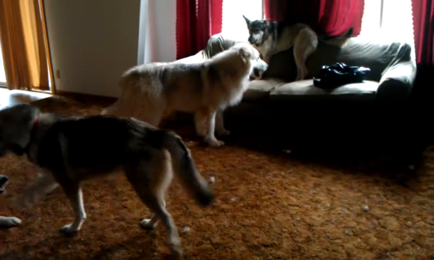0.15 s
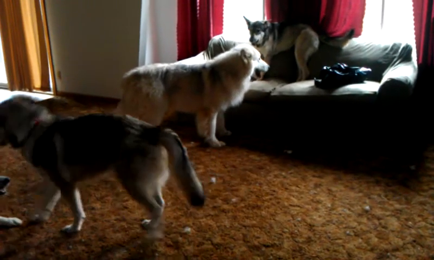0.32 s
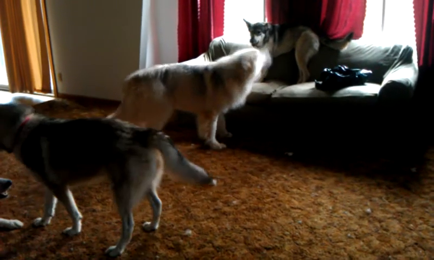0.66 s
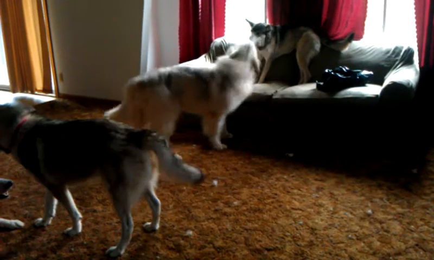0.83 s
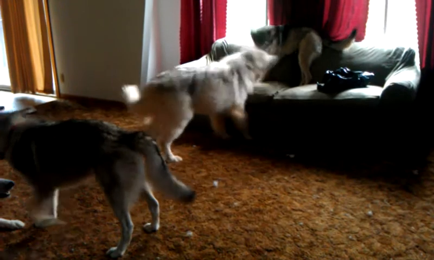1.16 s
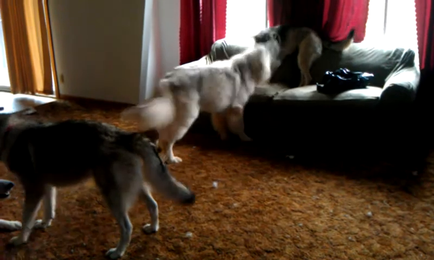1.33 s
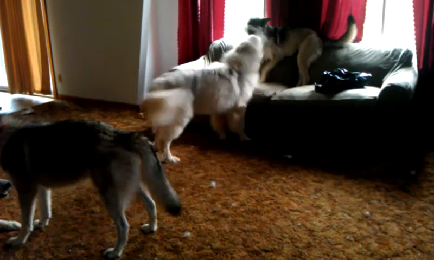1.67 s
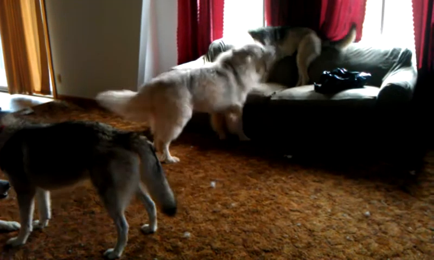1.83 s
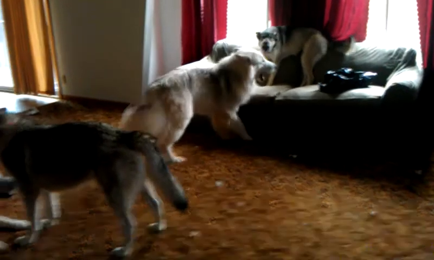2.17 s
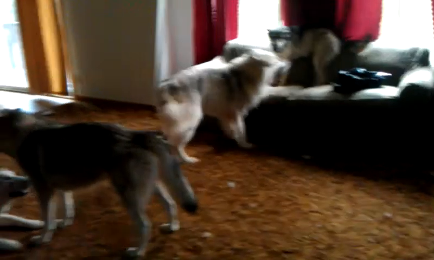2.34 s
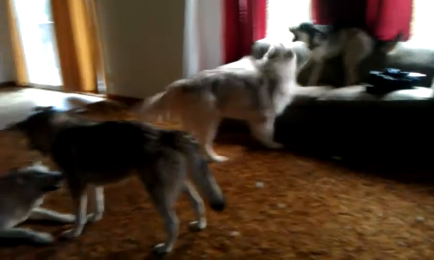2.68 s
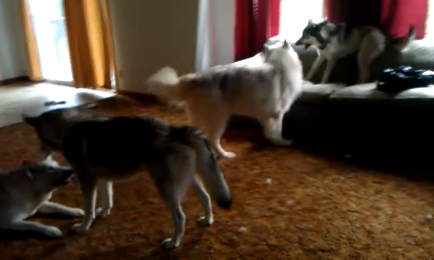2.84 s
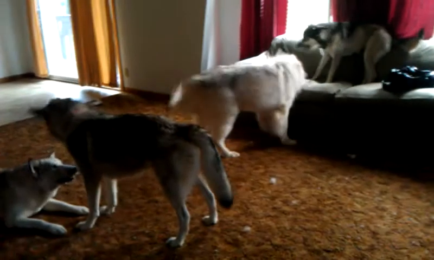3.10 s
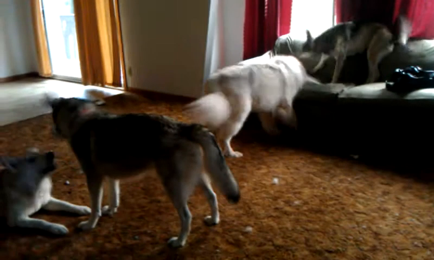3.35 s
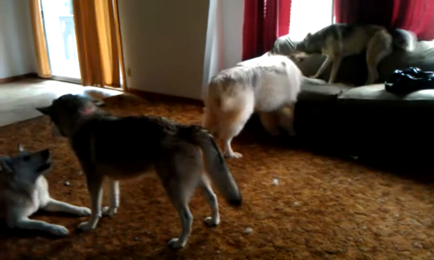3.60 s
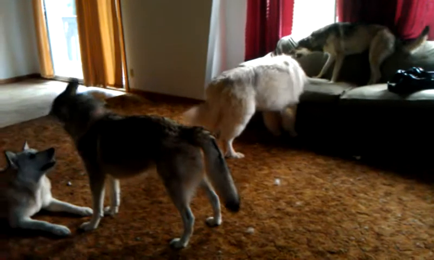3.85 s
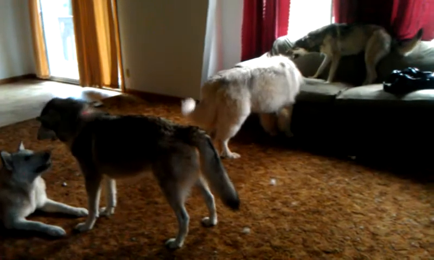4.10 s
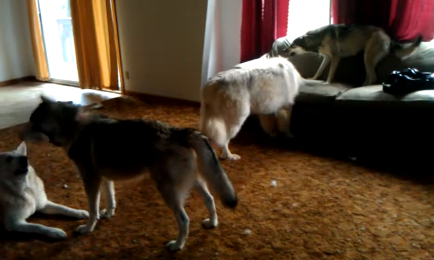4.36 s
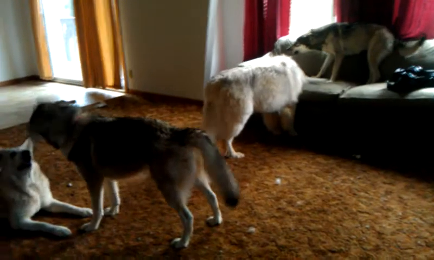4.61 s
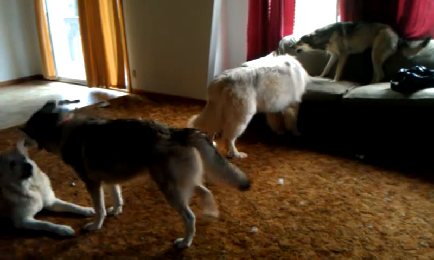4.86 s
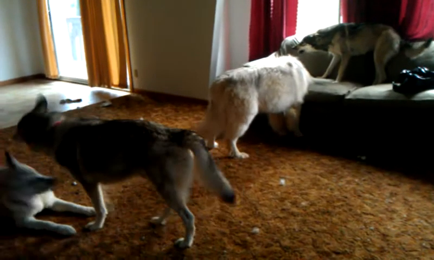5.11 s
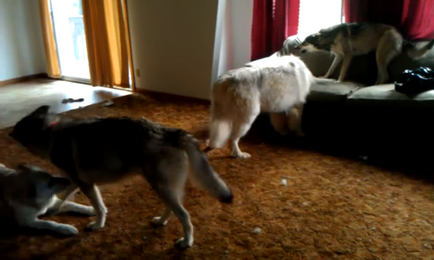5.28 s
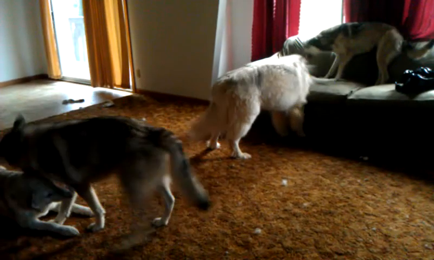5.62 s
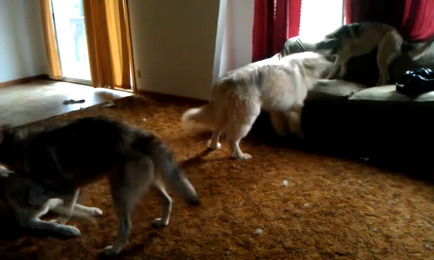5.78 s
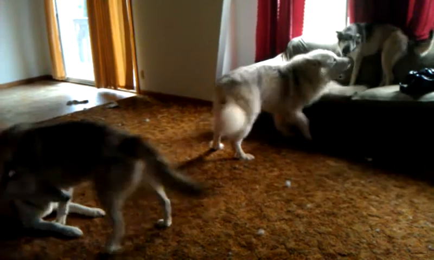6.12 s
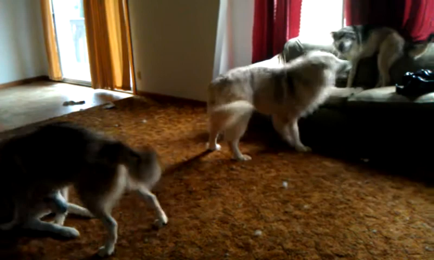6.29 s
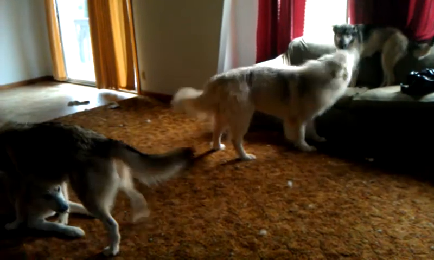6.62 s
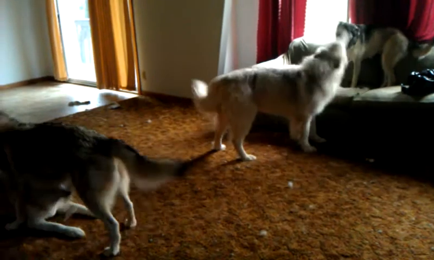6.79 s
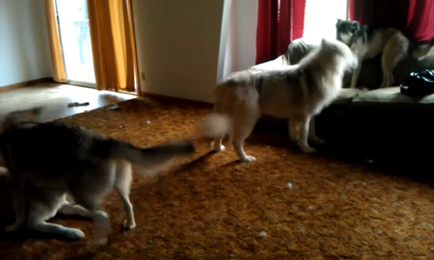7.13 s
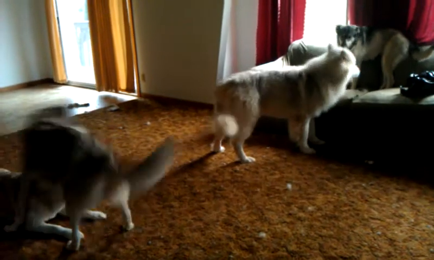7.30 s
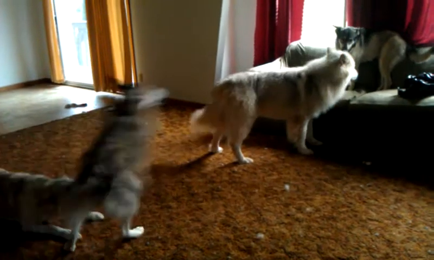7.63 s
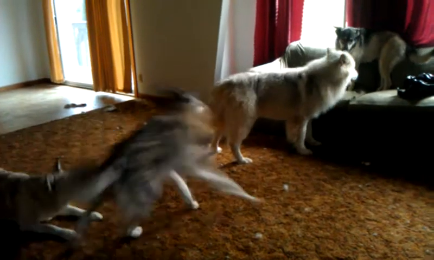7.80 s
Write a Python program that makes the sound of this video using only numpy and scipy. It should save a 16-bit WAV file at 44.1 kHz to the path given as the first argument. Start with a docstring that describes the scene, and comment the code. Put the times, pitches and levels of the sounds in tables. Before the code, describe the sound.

Two huskies vocalize at play in a living room. From about 0.2 to 1.1 seconds, one gives a quick run of short, whiny yowls, each scooping up and sinking, sometimes cracking. The other answers with short, higher, hoarse barks at about 1.2, 2.0 and 2.5 seconds, alternating with more yowls around 1.7, 2.3 and 3.0. The barks then continue alone at 3.3, 3.6, 4.1 and 4.7 seconds. From 5.4 to 7.3 the yowls return in a steady string, mostly lower and sinking into groans, with two rougher barks at 5.6 and 6.2. Faint, thin nasal whistles top the calls near the start, at 3 seconds and around 7. Paws thud softly on carpet at 7.1 and, more faintly, 7.9 seconds. The room echoes briefly over very faint room noise and electrical hum, and the loudest calls slightly overload the small microphone.

```python
"""Two huskies play-wrestle: one yowls and whines in short arched calls, the other answers in hoarse barks.
Their vocal folds buzz, throat and mouth shape the buzz, and uneven vibration and rushing air roughen it.
A tight throat adds thin whistles. Paws thud softly on the carpet, the living room rings briefly
and the mains hum faintly. The loudest calls overload the camera's small microphone."""
import sys
import numpy as np
from scipy import signal
from scipy.fft import rfft, irfft, next_fast_len
from scipy.io import wavfile
from scipy.ndimage import map_coordinates

SR = 44100
rng = np.random.default_rng(int(sys.argv[2]) if len(sys.argv) > 2 else 0)


def master_out(mix):
    """Clip the mix to full scale and print it as 16-bit PCM to the path in sys.argv[1]."""
    frames = np.transpose(np.atleast_2d(mix))
    ceiling = np.clip(frames, -1, 1)
    pcm = np.round(ceiling * 32767).astype(np.int16)
    wavfile.write(sys.argv[1], SR, pcm)


N = 350771

# the thin treble from the muzzle: f/Hz, relative level/dB
MUZZLE_TREBLE = [(1500, -48.5), (3100, -12.5), (4500, -6), (5800, -6), (8000, -12.5), (11000, -25.5),
                 (15500, -33)]


def yowls():
    """The first dog: clear arched calls that crack now and then and sink into a groan."""
    # each row is a yowl, or a brief tone swelling just after one:
    # start/s, rise/s, hold/s, fall/s, top pitch/Hz, climb/s, final sink/octaves,
    # relative level/dB of the low, middle and high resonance, factor on the resonance frequencies
    sounds = [ (0.189, 0.049, 0.024, .05, 795, 0.0068, .45, -29, -43.5, -19, 0.98),
              (.258, .026, 0.021, .07, 669.6, .008, .45, -24.5, -36, -41.5, .93),
              (.485, 0.06, 0.041, 0.067, 605.6, .065, 0.21, -10.5, -19.5, -11.5, 0.96),
              (.605, 0.017, 0.031, 0.046, 583.2, 0.01, 0.52, -18, -19, -37, 0.89),
              (0.685, 0.049, 0.091, 0.045, 521.9, 0.069, .6, -12.5, -20, -20.5, 0.92),
              (.865, 0.029, .015, .04, 510, .015, .3, -13.5, -40.5, -53.5, 1.037),
              (0.959, 0.084, .054, .04, 548.5, .085, .6, -9.5, -33, -13, 0.942),
              (1.45, 0.016, 0.14, 0.032, 500, .06, .3, -48, -52.5, -57.5, 1.05),
              (1.605, 0.043, 0.025, .115, 581.4, 0.042, 1.1, -39.5, -12, -30, 0.89),
              (1.672, 0.079, 0.041, .08, 543.3, .09, 1.1, -10, -18, -14, 0.94),
              (2.317, .038, 0.084, 0.045, 554.2, .012, 0.35, -16.5, -15, -17.5, 0.89),
              (2.838, 0.046, 0.072, 0.072, 565.4, 0.072, 0.2, -37, -32, -29.5, 0.95),
              (3.021, .052, .082, .125, 528.6, .06, 1.7, -21.5, -20.5, -18.5, 0.92),
              (5.35, 0.07, 0.075, 0.069, 567, .09, .4, -15, -33, -34.5, 0.96),
              (5.742, .09, .06, .075, 518.7, 0.066, 0.87, -16, -22.5, -17, .88),
              (6.012, 0.047, .08, 0.055, 462.3, .105, .5, -9, -22.5, -19.5, 0.88),
              (6.353, 0.048, 0.086, 0.073, 461.6, 0.14, .5, -14.5, -22.5, -26, 0.82),
              (6.595, 0.05, .085, .085, 431.4, .12, 0.66, -14, -32, -30, 0.8),
              (6.858, .072, .05, .11, 446.5, .07, 1.3, -16, -23.5, -29, .92),
              (7.153, .068, 0.024, 0.084, 599.3, .06, .65, -30, -20, -29, 1.02)]
    # level changes, one row a resonance: lead-in/dB, catch/dB, end/dB, edges of the hold/dB
    shape = [(-16.5, -13.5, -22, 1.5), (-13, -3, -23.5, -3), (-14, -11, -33.5, -6)]
    # moments when the voice cracks: t/s, length/s, roughness from 0 to 1
    cracks = [(.54, .02, .2), (.29, .05, .15), (.635, .04, .3), (1.0, .05, .45), (1.5, .08, .4),
              (1.73, .05, .5), (2.38, .11, .55), (2.96, .08, .08), (3.05, .03, .3), (6.41, .05, .6),
              (6.96, .1, .2)]
    track = np.zeros(N)
    for row in sounds:
        start, shift = row[0], row[10]
        t, hz, levels_db = arch(row, shape)
        cracking = sum(depth * np.exp(-(2 * (start + t - s) / length) ** 2) for s, length, depth in cracks)
        rough = np.clip(.01 + cracking, 0, 1)
        sound = voice(t, hz, levels_db, rough, shift,
                      jitter=.0085, rasp_db=-2.5, squeak_db=-47.5, air_db=-39)
        add(track, start, sound)
    return amp(-2) * track


def barks():
    """The second dog: each bark starts as a rising tone and is hoarsest near its middle."""
    # one bark a row: start/s, rise/s, hold/s, fall/s, top pitch/Hz, climb/s, final sink/octaves,
    # relative level/dB of the low, middle and high resonance, factor on their frequencies, hoarseness
    calls = [ (1.16, .06, .03, 0.077, 717.7, .07, .2, -26.5, -33, -39.5, 1.35, 0.4),
             (2.017, .042, 0.067, .05, 691.6, 0.1, 0.38, -19, -13.5, -14.5, 1.082, 0.5),
             (2.539, 0.03, 0.091, .045, 693, 0.084, .45, -21, -19.5, -24, 1.17, .65),
             (3.285, .053, .032, .07, 720.4, 0.056, .25, -22.5, -19, -34.5, 1.31, .35),
             (3.585, 0.048, .065, .1, 684.3, .11, .35, -19, -20.5, -24.5, 1.142, .55),
             (4.098, 0.053, 0.078, .07, 677.5, 0.11, 0.27, -23.5, -19.5, -23.5, 1.12, .6),
             (4.703, .048, .085, 0.059, 672, 0.12, 0.35, -23.5, -20, -29, 1.175, 0.5),
             (5.555, 0.045, .065, 0.068, 663, .075, .25, -19.5, -17, -24.5, 1.22, .75),
             (6.162, 0.034, .08, 0.072, 676.7, .115, .3, -21.5, -16.5, -17, 1.09, 0.9)]
    # level changes, one row a resonance: lead-in/dB, catch/dB, end/dB, edges of the hold/dB
    shape = [(-22, -9, -9, 2.5), (-24, -5, -19.5, -8), (-18, -4.5, -19, -5)]
    # hoarseness sets in and eases: share of the call, share of its hoarseness
    hoarse_curve = [(0, .2), (.28, .16), (.44, .95), (.7, 0.65), (1, .35)]
    track = np.zeros(N)
    for call in calls:
        start, shift, hoarseness = call[0], call[10], call[11]
        t, hz, levels_db = arch(call, shape)
        rough = hoarseness * np.interp(t / t[-1], *np.transpose(hoarse_curve))
        bark = voice(t, hz, levels_db, rough, shift, jitter=.016, rasp_db=-3.5, squeak_db=-39, air_db=-35)
        add(track, start, bark)
    return amp(.05) * track


def arch(call, shape):
    """One call's pitch and levels: it scoops up and sinks, with the mouth widest halfway through the hold."""
    rise, hold, fall, top_hz, climb, sink = call[1:7]
    scoop_octaves, catch_s, flutter_db = .37, .012, 3
    t = np.arange(0, rise + hold + fall, 1 / SR)
    rising = np.clip(1 - t / rise, 0, 1)
    catching = np.clip((rise - t) / catch_s, 0, 1)  # the voice catches at the end of the rise
    falling = np.clip((t - rise - hold) / fall, 0, 1)
    closing = np.clip(2 * (t - rise) / hold - 1, -1, 1) ** 2
    octaves_down = scoop_octaves * np.clip(1 - t / climb, 0, 1) ** 1.8
    octaves_down += sink * np.sin(np.pi / 2 * falling) ** 1.7
    octaves_down += .012 * wobble(len(t), 39.9)  # the pitch wanders a little
    levels_db = []
    for full_db, (lead_db, catch_db, end_db, edge_db) in zip(call[7:10], shape):
        effort_db = lead_db * rising ** 1.8 + catch_db * catching + end_db * falling ** .62
        flutter = flutter_db * wobble(len(t), 36.56)  # jaw and tongue move
        levels_db.append(full_db + effort_db + edge_db * closing + flutter)
    return t, top_hz * 2 ** -octaves_down, levels_db


def voice(t, hz, levels_db, rough, shift, jitter, rasp_db, squeak_db, air_db):
    """The vocal folds' harmonics sweep through resonances, which a shorter throat shifts upward."""
    # low, middle and high resonance (the bands that throat and mouth boost), each: f/Hz, gain/dB
    resonances = [
        [(130, -35.5), (250, -25), (335, -14.5), (392, -9.5), (700, 0.5), (850, -15), (1200, -41), (4000, -87)],
        [(200, -55.5), (620, -36), (790, -4.5), (1270, -4), (1450, -39), (1900, -47), (5000, -86.5)],
        [(400, -61.5), (1120, -41.5), (1350, -4), (1750, -3.5), (2100, -15), (2500, -29.5), (3200, -58.5),
         (12000, -65.5)],
    ]
    n = len(t)
    low, middle, high = amp(levels_db)
    treble = np.hypot(middle, high) ** .63  # grows more slowly than the body of the call
    # as the pitch sinks from its top, the folds go slack and the tone breaks up
    slack = np.clip(2.2 * (1 - hz / np.maximum.accumulate(hz)) - .2, 0, .55)
    rough = np.maximum(rough, slack)
    # rough cycles are uneven in length
    hz = hz * (1 + (jitter + .05 * slack) * wobble(n, 110) + (.004 + .045 * rough) * wobble(n, 500))
    phase = 2 * np.pi * np.cumsum(hz) / SR
    harmonics = []
    for k in range(1, 24):
        body = sum(amp(db + along(band, k * hz / shift)) for db, band in zip(levels_db, resonances))
        shimmer_db = 4 * wobble(n, 25)
        squeak = (1 - rough) ** 3 * treble * amp(squeak_db + along(MUZZLE_TREBLE, k * hz) + shimmer_db)
        harmonics.append(np.sqrt(2) * (body + squeak) * np.sin(k * phase + rng.uniform(0, 2 * np.pi)))
    # strong and weak cycles take turns, which adds tones halfway between the harmonics
    doubling = 1 + .7 * rough * np.cos(phase / 2 + wobble(n, 90))
    tone = np.sqrt(1 - rough / 2) * harmonics[0] + np.sqrt(1 - rough) * doubling * sum(harmonics[1:])
    puffs = 1 + np.cos(phase) / 2  # swirling air escapes in one puff a cycle
    swirl = sum(size * noise(n, np.multiply(band, [shift, 1]), puffs)
                for size, band in zip([.55 * low, middle, high], resonances))
    rasp = amp(rasp_db) * np.sqrt(rough) * swirl
    air = amp(air_db) * treble * np.sqrt(rough + .04) * noise(n, MUZZLE_TREBLE, puffs)
    fade = np.clip(t / .025, 0, 1) * np.clip((t[-1] - t) / .021, 0, 1)
    throb = amp(2.8 * np.sqrt(rough) * wobble(n, 100))  # a rough voice also throbs in strength
    return fade * throb * (tone + rasp + air)


def whistles():
    """A tight throat adds a wavering high tone, independent of the main pitch, and a thin hiss."""
    # thin nasal whistles on top of some calls: t/s, length/s, f/Hz, level/dB
    whines = [(.185, 0.15, 4800, -55), (0.28, 0.08, 5600, -55), (3.054, 0.18, 6250, -55),
              (6.68, 0.07, 5900, -62), (6.908, 0.15, 5090, -61), (7.203, 0.14, 5700, -57)]
    track = np.zeros(N)
    for s, length, hz, db in whines:
        n = int(length * SR)
        waver = 1 + .025 * wobble(n, 60) + .012 * wobble(n, 700)
        tone = np.sin(2 * np.pi * np.cumsum(hz * waver) / SR)
        hiss = amp(-4) * noise(n, MUZZLE_TREBLE)
        add(track, s, amp(db) * np.hanning(n) * (tone + hiss))
    return track


def paws():
    """A soft landing makes the floor boom for a moment."""
    # paws landing on the carpet: t/s, relative level/dB
    landings = [(7.138, -56.5), (7.897, -68)]
    attack_s, ring_s = .006, .18
    track, t = np.zeros(N), np.arange(SR // 3) / SR
    for s, db in landings:
        boom = noise(len(t), [(40, -42), (90, -37), (180, 24), (280, -21), (1000, -52), (5000, -59)])
        add(track, s, amp(db + 3 - 60 * t / ring_s) * (1 - np.exp(-t / attack_s)) * boom)
    return track


def room(x, early_db, late_db):
    """Near walls echo within a few hundredths of a second; a smooth, fading tail follows."""
    # how long the room takes to fade by 60 dB: f/Hz, t/s
    ring_times = [(150, 0.54), (500, 0.46), (1500, 0.41), (5000, 0.64), (12000, 0.76)]
    hz, t, spectrum = signal.stft(rng.standard_normal(SR * 3 // 4), SR, nperseg=256)
    decay = amp(-60 * t / along(ring_times, hz)[:, None])
    build_up = 1 - np.exp(-t / .0039)
    tail = signal.istft(spectrum * decay * build_up, SR, nperseg=256)[1]
    walls = np.zeros(len(tail))
    walls[(rng.uniform(.003, .04, size=12) * SR).astype(int)] = rng.standard_normal(12)
    echoes = amp(early_db) * walls / np.linalg.norm(walls) + amp(late_db) * tail / np.linalg.norm(tail)
    return x + signal.fftconvolve(x, echoes)[:N]


def background():
    """Faint room noise and mains hum."""
    # the noise of the still room: f/Hz, relative level/dB
    still_room = [(30, -26.5), (70, -20), (150, 5.5), (350, 7), (700, -8.5), (2000, -10), (6000, -20),
                  (15000, -35.5)]
    hum = np.sqrt(2) * np.sin(2 * np.pi * 119.7 * np.arange(N) / SR)
    return amp(-70) * noise(N, still_room) + amp(-75.5) * hum


def amp(db):
    """Turn decibels into a gain."""
    return 10 ** (np.asarray(db) / 20)


def along(points, hz):
    """Read between (f/Hz, value) points on a logarithmic frequency axis."""
    f, v = np.transpose(points)
    return np.interp(np.log(hz + 1), np.log(f + 1), v)


def wobble(n, rate):
    """A smooth curve through `rate` random values a second."""
    return map_coordinates(rng.standard_normal(2048), [np.arange(n) * rate / SR], mode="wrap")


def noise(n, spectrum, gate=1):
    """Noise pulsed by `gate`, coloured by (f/Hz, level/dB) points and scaled to a strength (rms) of 1."""
    x = filtered(gate * rng.standard_normal(n), lambda hz: amp(along(spectrum, hz)))
    return x / np.sqrt(np.mean(x ** 2) + 1e-20)


def filtered(x, gain):
    """Turn each frequency up or down by gain(hz)."""
    m = next_fast_len(len(x) + 2048)
    return irfft(rfft(x, m) * gain(np.fft.rfftfreq(m, 1 / SR)), m)[:len(x)]


def add(track, s, sound):
    """Mix a sound into the track at s seconds."""
    part = track[round(s * SR):][:len(sound)]
    part += sound[:len(part)]


def scene():
    """The dogs in their room, in mono."""
    dogs = yowls() + barks() + whistles() + paws()
    return (room(dogs, early_db=-5.5, late_db=-7.5) + background())[None]


def record(dry):
    """Loud peaks overload the microphone and buzz; the camera cuts deep bass and the highest treble."""
    limit, low_cut_hz, top_hz = amp(-11), 75, 15750
    # tones up to about 1.5 kHz swing the microphone alike; the high treble swings it less
    swing = filtered(dry[0], lambda hz: amp(along([(400, 2), (600, 1.5), (1500, 2), (4000, -5.5)], hz)))
    excess = swing - np.clip(swing, -limit, limit)
    squashed = dry[0] - .6 * excess
    return filtered(squashed, lambda hz: (hz < top_hz) * hz / np.hypot(hz, low_cut_hz))[None]


dry = scene()
out = record(dry)
master_out(out)
```